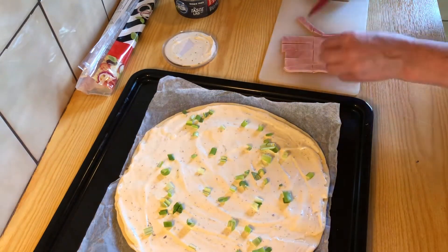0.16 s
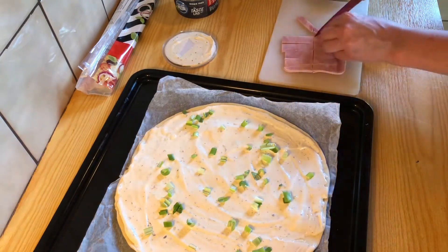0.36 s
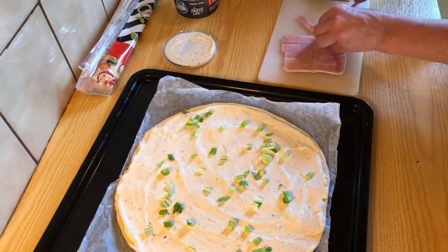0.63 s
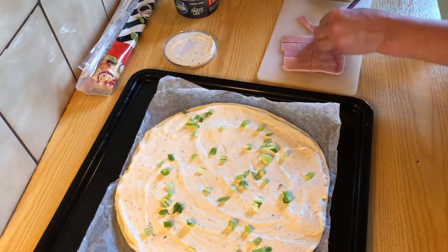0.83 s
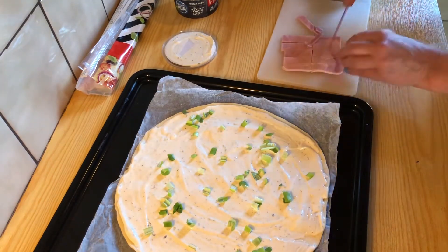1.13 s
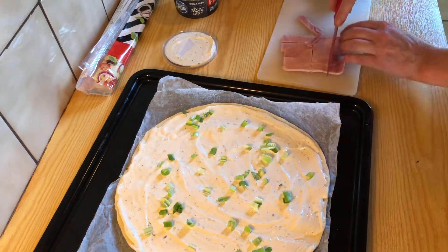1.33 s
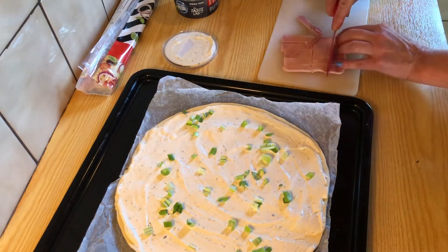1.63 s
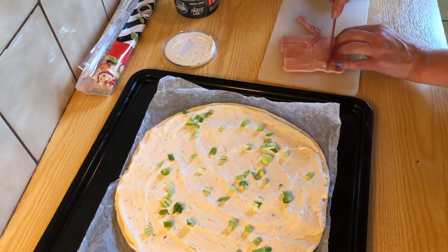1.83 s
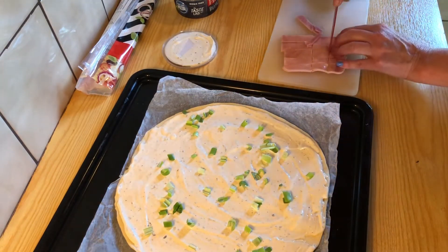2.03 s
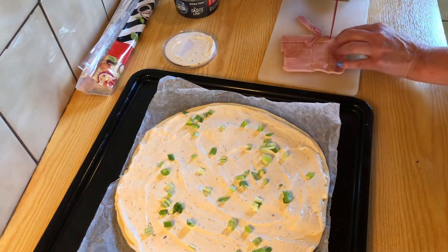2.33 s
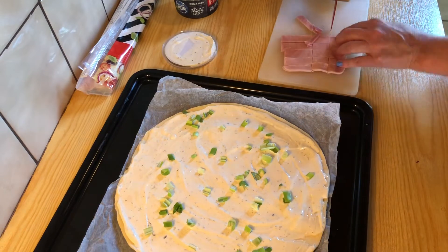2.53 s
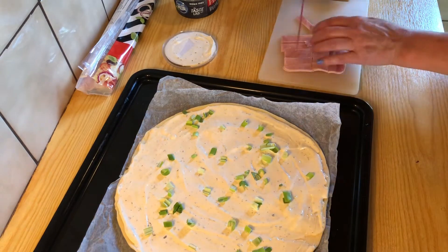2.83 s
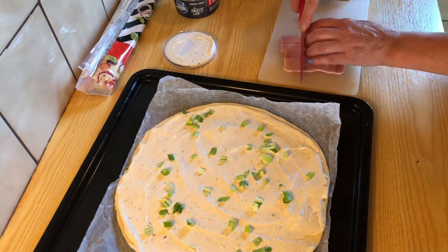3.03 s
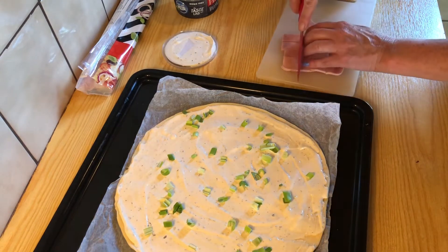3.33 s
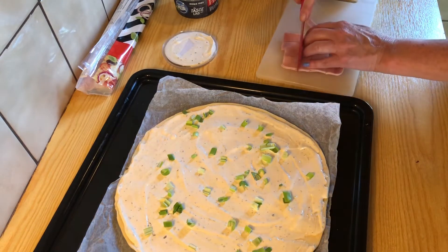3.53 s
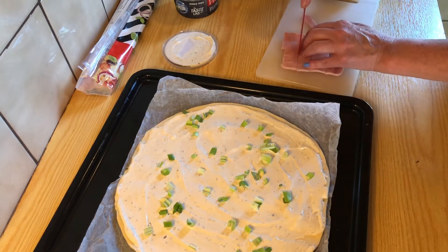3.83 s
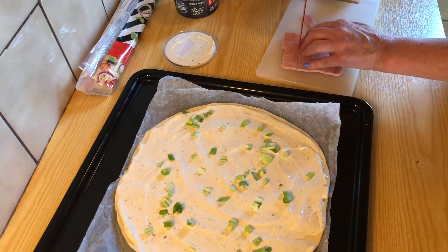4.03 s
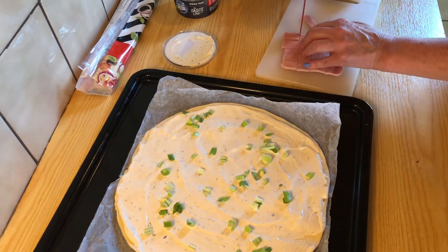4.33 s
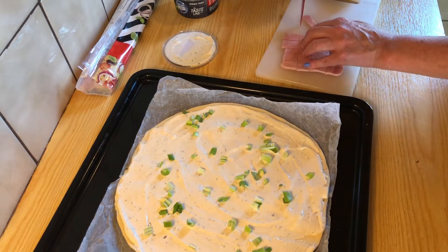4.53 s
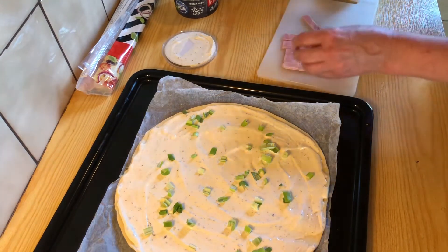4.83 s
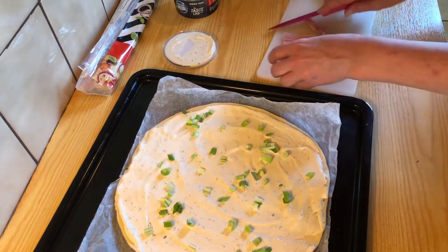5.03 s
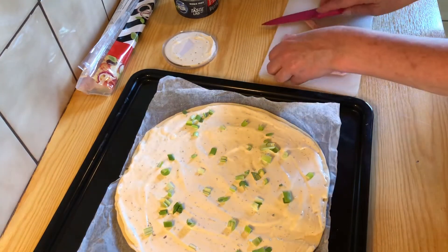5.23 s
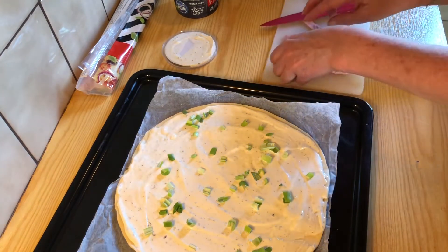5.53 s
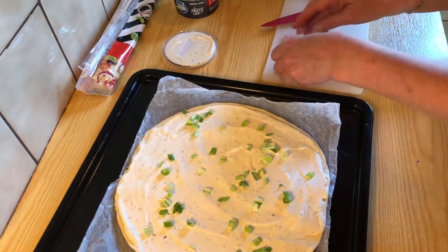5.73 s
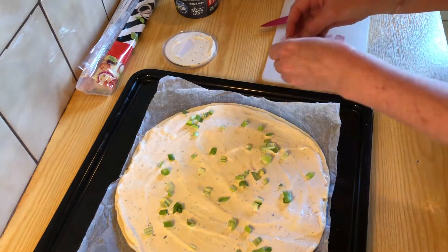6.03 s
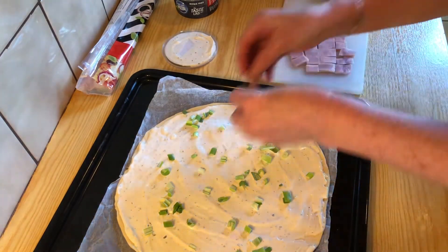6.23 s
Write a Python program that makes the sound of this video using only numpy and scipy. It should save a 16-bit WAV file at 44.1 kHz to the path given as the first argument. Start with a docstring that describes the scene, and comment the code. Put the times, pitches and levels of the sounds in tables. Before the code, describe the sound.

In a quiet small kitchen, an appliance hums steadily under faint room hiss. Close by, a knife scrapes across a plastic cutting board in short, uneven strokes, making small wet sounds as it slices ham. Light taps lead to a sharp knock, and a heavier stroke makes the board shudder. The knife is then laid down with two loud clacks, followed by fading rubs and squelches.

```python
"""A kitchen knife slices ham on a plastic board on a wooden table, over motor hum and room air.
From the start the edge rasps over the board by stick and slip, and the wet slices squelch as they part.
The edge knocks on the board now and then, hard at 3 s; at 4.5 s a firm stroke makes the board judder.
Near 5 s the knife is put down: board, blade and handle clatter. A few fading rubs and squelches follow."""
import sys
import numpy as np
from scipy import signal
from scipy.fft import rfft, irfft
from scipy.io import wavfile

SR = 44100
rng = np.random.default_rng(int(sys.argv[2]) if len(sys.argv) > 2 else 0)


def unload_audio(sound):
    """Save the sound as a 16-bit wav file, at the path given as the first command line argument."""
    columns = np.transpose(np.atleast_2d(sound))
    # keep every value between -1 and 1, then stretch to whole-number steps
    steps = np.round(np.clip(columns, -1, 1) * 32767)
    wavfile.write(sys.argv[1], SR, steps.astype(np.int16))


N = 281358
TIME_S = np.arange(N) / SR

# spectra of a moist snap, bright part and hollow part: f/Hz, relative density/dB
FIZZ_SPECTRUM = [(1500, -67.5), (3500, 3), (5500, 5), (8000, -1), (11000, -5), (15500, -9.5)]
SMACK_SPECTRUM = [(500, -42.5), (1100, 11.5), (1500, 10.5), (2200, 9), (3200, 9), (4200, -10.5),
                  (6000, -25), (12000, -42)]


def gain_of(db):
    """Decibels to amplitude."""
    return 10 ** (np.asarray(db) / 20)


def unit_rms(x):
    """Scales to rms 1."""
    return x / np.sqrt(np.mean(x ** 2) + 1e-20)


def lookup(points, hz):
    """Interpolates a table over log frequency."""
    f, value = np.transpose(points)
    return np.interp(np.log(hz + 1), np.log(f + 1), value)


def add(mix, start_s, sound):
    """Mixes a sound in, in place."""
    part = mix[max(round(start_s * SR), 0):][:len(sound)]
    part += sound[:len(part)]


def colour(x, spectrum, peaks=(), size=4096):
    """Minimum-phase filter: broad spectrum plus resonance peaks."""
    hz = abs(np.fft.fftfreq(size, 1 / SR))
    peaks_db = sum(lift / (1 + (2 * (hz - f) / width) ** 2) for f, width, lift in peaks)
    log_gain = np.log(gain_of(lookup(spectrum, hz) + peaks_db))
    response = np.exp(np.conj(signal.hilbert(log_gain)))
    return signal.oaconvolve(x, np.fft.ifft(response).real[:size // 2])[:len(x)]


def drift(rate_hz):
    """Slow random wander, rms 1."""
    hz = np.fft.rfftfreq(N, 1 / SR)
    return unit_rms(irfft(rfft(rng.standard_normal(N)) * np.exp(-(hz / rate_hz) ** 2), N))


def grains(per_s, spread_db):
    """Random impulses of uneven size, rms 1."""
    size = gain_of(spread_db * np.minimum(rng.exponential(1, N), 4))
    return unit_rms(size * rng.choice([-1, 1], N) * (rng.random(N) < per_s / SR))


def air():
    """Room hiss and slowly sinking rumble."""
    # f/Hz, relative density/dB
    hiss_spectrum = [(180, -43), (300, -14), (378, -3), (398, -4), (477, -2.5), (554, -8.5), (602, -3),
                     (784, -3.5), (896, -2.5), (1270, -9.5), (1710, -16.5), (6330, -24), (15800, -31)]
    rumble_spectrum = [(20, -29), (36, -40), (48, -2), (65, 7.5), (80, 1), (100, 10), (125, -2),
                       (170, -4.5), (250, -8), (400, -14), (900, -66.5)]
    hiss = unit_rms(colour(rng.standard_normal(N), hiss_spectrum))
    rumble = unit_rms(colour(rng.standard_normal(N), rumble_spectrum, size=16384))
    sink_db_per_s = 0.52
    return gain_of(-65) * hiss + gain_of(-61.5 - sink_db_per_s * TIME_S) * rumble


def motor():
    """Appliance hum, strongest at three times the shaft rate, with a faint whine."""
    # multiple of the shaft rate, level/dB, unsteadiness 0-1
    harmonics = [(1, -70.5, 1), (2, -71, 0.6), (3, -55.5, 0.16), (4, -78, 0.2), (5, -78.5, 0), (11, -80, 0),
                 (12, -76, 0.09), (15, -79.5, 0), (25, -86, 1)]
    # f/Hz, level/dB
    whine_tones = [(4662, -89), (4910, -90), (6137, -88), (6675, -99), (8129, -90)]
    shaft_hz, sink_db_per_s = 49.09, 0.14
    out = np.zeros(N)
    for multiple, db, unsteady in harmonics:
        phasor = np.exp(2j * np.pi * (multiple * shaft_hz * TIME_S + rng.random()))
        wobble = 1 + unsteady * (drift(rate_hz=0.9) + 1j * drift(rate_hz=2.6))
        out += gain_of(db) * (phasor * wobble).real
    for hz, db in whine_tones:
        gain = gain_of(db + 0.7 * drift(rate_hz=0.94))
        out += gain * np.sin(2 * np.pi * hz * TIME_S + 0.6 * drift(rate_hz=6))
    return np.sqrt(2) * out * gain_of(-sink_db_per_s * (TIME_S - TIME_S.mean()))


def kitchen(x, early_db, tail_db, early_s):
    """Adds quick scatter from table and tray, then the tail of a small tiled room."""
    # f/Hz, t60/s
    reverb_times = [(100, 0.2), (300, 0.31), (1000, 0.25), (2200, 0.22), (5000, 0.22), (12000, 0.17)]
    t = np.arange(SR // 2) / SR
    early, late = rng.choice([-1., 1.], (2, len(t))) * (rng.random((2, len(t))) < 4000 / SR)
    early *= np.exp(-t / early_s) * (t > 0.0015)
    # small things on the table reflect little bass
    early = signal.sosfilt(signal.butter(2, 402, "highpass", fs=SR, output="sos"), early)
    hz, frame_s, bands = signal.stft(late * (t > 0.009), SR, nperseg=256)
    decay = gain_of(-60 * frame_s / lookup(reverb_times, hz)[:, None])
    tail = signal.istft(bands * decay, SR, nperseg=256)[1][:len(t)]
    echoes = gain_of(early_db) * early / np.linalg.norm(early)
    echoes += gain_of(tail_db) * tail / np.linalg.norm(tail)
    return x + signal.oaconvolve(x, echoes)[:N]


def stroke_gains():
    """Gains of rasp, judder and crackle; pressure builds and eases once per stroke."""
    # edge or meat over the board: start/s, hardest/s, end/s, rasp/dB, judder/dB, crackle/dB
    strokes = [ (0.0, 0.22, 0.41, -66, -71.5, -78), (0.412, 0.474, 0.52, -75, -61.5, -97),
               (0.588, 0.69, 0.92, -62.5, -74, -71.5), (0.684, 0.824, 0.9, -64.5, -53.5, -95),
               (1.022, 1.077, 1.324, -57, -63, -66), (1.305, 1.52, 1.8, -62, -68.5, -79),
               (1.738, 1.992, 2.19, -58, -69.5, -69), (2.146, 2.218, 2.45, -59.5, -65, -72.5),
               (2.29, 2.48, 2.7, -63, -58.5, -73.5), (2.803, 2.99, 3.13, -68, -69, -69),
               (3.366, 3.90, 4.2, -67.5, -68, -73), (4.08, 4.234, 4.41, -62.5, -61.5, -82),
               (4.35, 4.46, 4.74, -59, -52.5, -76.5), (4.506, 4.553, 4.595, -46, -44, -91),
               (5.012, 5.14, 5.46, -59, -55, -69), (5.638, 5.7, 5.87, -65, -60, -92),
               (6.043, 6.277, 6.6, -86, -73, -77), ]
    swells_db = (8.5, 12, 10.5)  # lightest touch to full pressure
    touch_s = 0.044
    powers = np.zeros((3, N))
    for start_s, hardest_s, end_s, *levels_db in strokes:
        t = np.arange(start_s, end_s, 1 / SR)
        pressure = np.interp(t, [start_s, hardest_s, end_s], [0, 1, 0])
        contact = np.clip(np.minimum(t - start_s, end_s - t) / touch_s, 0, 1)
        for power, db, swell_db in zip(powers, levels_db, swells_db):
            add(power, start_s, (contact * gain_of(db + swell_db * (pressure - 1))) ** 2)
    return np.sqrt(powers)


def moist_crackle(gain):
    """Patches of tiny wet snaps as the edge works through the meat."""
    tilt_db_per_oct, smack_db = 2, -5
    snaps = grains(per_s=700, spread_db=1.5) * gain_of(2.1 * drift(rate_hz=32))
    tilted = [(hz, db + tilt_db_per_oct * np.log2(hz / 8000)) for hz, db in FIZZ_SPECTRUM]
    fizz = unit_rms(colour(snaps, tilted))
    smack = unit_rms(colour(snaps, SMACK_SPECTRUM))
    return gain * (fizz + gain_of(smack_db) * smack)


def squelches():
    """Ham parts: moisture films snap in clumps, each ringing in its own pockets between the slices."""
    # t/s, length/s, fizz/dB, smack/dB, fizz tilt/(dB/octave)
    clumps = [ (0.047, 0.027, -72.5, -70, 4), (0.148, 0.01, -67, -66, -2), (0.181, 0.03, -63.5, -63, 10),
              (0.2345, 0.003, -66, -59, 1), (0.252, 0.057, -67.5, -67, 2), (0.323, 0.02, -58.5, -62.5, 2),
              (1.058, 0.022, -52.5, -57.5, 2.5), (1.099, 0.13, -66.5, -66, 5),
              (1.209, 0.014, -62.5, -59.5, -2), (1.586, 0.037, -60, -57, 3),
              (1.616, 0.011, -54, -51.5, 3.5), (1.831, 0.013, -63.5, -61, 6), (1.903, 0.034, -54.5, -55, 6),
              (1.968, 0.064, -55.5, -57.5, 0.5), (2.041, 0.0042, -48.5, -48, -1),
              (2.401, 0.012, -61.5, -71, -2), (2.437, 0.066, -64.5, -63.5, 12),
              (2.577, 0.0052, -64.5, -76, 4), (2.829, 0.008, -57.5, -63, 2.5), (2.844, 0.021, -67, -66, -1),
              (2.925, 0.081, -71, -81, 16), (3.436, 0.052, -79, -69, 1), (3.615, 0.029, -74, -75, 9),
              (4.041, 0.041, -70, -66.5, 4), (4.512, 0.062, -65.5, -60.5, 0), (4.69, 0.039, -66.5, -72, 6),
              (4.766, 0.0075, -64.5, -69.5, 8), (5.45, 0.028, -64.5, -68.5, 2),
              (6.045, 0.038, -71.5, -68.5, 6), ]
    out = np.zeros(N)
    snaps = grains(per_s=3000, spread_db=1.0)
    for start_s, length_s, fizz_db, smack_db, tilt in clumps:
        window = signal.windows.tukey(int((length_s + 0.004) * SR), 0.6)
        clump = unit_rms(snaps[int(start_s * SR):][:len(window)])
        burst = np.pad(clump * window, (0, 512))
        pockets_hz = 1300 * 1.59 ** (np.arange(6) + rng.random(6))
        peaks = [(hz, 0.22 * hz, 5.5) for hz in pockets_hz]
        tilted = [(hz, db + tilt * np.clip(np.log2(hz / 8000), -1, 0.6)) for hz, db in FIZZ_SPECTRUM]
        fizz = gain_of(fizz_db) * unit_rms(colour(burst, tilted, peaks, size=1024))
        smack = gain_of(smack_db) * unit_rms(colour(burst, SMACK_SPECTRUM, peaks, size=1024))
        add(out, start_s - 0.0015, np.std(burst) * (fizz + smack))
    return out


def scrapes():
    """Friction feeds one resonance of blade or board, which glides as the contact moves."""
    # start/s, loudest/s, end/s, first f/Hz, last f/Hz, width/Hz, level/dB
    glides = [ (0.046, 0.052, 0.105, 2860, 2950, 250, -69), (0.23, 0.233, 0.275, 1270, 1280, 121, -54.5),
              (0.332, 0.336, 0.355, 1355, 1340, 121, -53.5), (0.64, 0.772, 0.86, 1547, 850, 650, -58.5),
              (1.413, 1.61, 1.645, 1298, 1580, 380, -61), (2.375, 2.395, 2.52, 1150, 1140, 170, -56),
              (4.382, 4.563, 4.58, 3100, 2774, 1100, -64), (4.41, 4.452, 4.58, 1155, 1146, 200, -55.5),
              (4.529, 4.56, 4.582, 271.6, 296, 93.5, -41.5), (5.141, 5.155, 5.162, 2120, 2350, 350, -49.5),
              ]
    out = np.zeros(N)
    for start_s, loudest_s, end_s, first_hz, last_hz, width_hz, db in glides:
        t = np.arange(start_s, end_s, 1 / SR)
        pole = np.exp(-np.pi * width_hz / SR)
        friction = rng.standard_normal(SR) + 1j * rng.standard_normal(SR)
        flutter = signal.lfilter([1], np.poly([pole, pole]), friction)[-len(t):]
        phasor = np.exp(2j * np.pi * np.cumsum(np.geomspace(first_hz, last_hz, len(t))) / SR)
        envelope = np.interp(t, [start_s, loudest_s, end_s], [0, 1, 0])
        add(out, start_s, gain_of(db) * envelope * unit_rms((flutter * phasor).real))
    return out


def slicing(rasp_gain, judder_gain):
    """The edge sticks and slips on the plastic; under pressure the whole board judders."""
    # f/Hz, relative density/dB
    rasp_spectrum = [(240, -24), (400, -10.5), (558, -5.5), (734, -5.5), (841, -8.5), (1160, -8.5),
                     (1250, -7.5), (1740, -10.5), (2220, -14), (2510, -17), (3010, -19.5), (15000, -44.5)]
    judder_spectrum = [(90, -22), (160, 1.5), (235, 6.5), (300, 1.5), (365, 0), (450, -12.5), (700, -30.5),
                       (1500, -81)]
    # f/Hz, width/Hz, lift/dB
    rub_resonances = [(372, 41, 3.5), (733, 13, 1), (920, 11, 9), (1095, 80, 7.5), (1386, 110, 6.5),
                      (1520, 170, -3.5), (2330, 270, 1.5)]
    slips = grains(per_s=1500, spread_db=0.5) * gain_of(2.9 * drift(rate_hz=51))
    rasp = unit_rms(colour(slips, rasp_spectrum, rub_resonances))
    judder = unit_rms(colour(slips, judder_spectrum, rub_resonances))
    return rasp_gain * rasp + judder_gain * judder


def ring(modes, rise_s):
    """Free ringing of a struck object; neighbouring modes alternate in sign."""
    t = np.arange(SR // 2) / SR
    swing = sum((-1) ** k * gain_of(db - 60 * t / t60_s) * np.sin(2 * np.pi * hz * t)
                for k, (hz, db, t60_s) in enumerate(modes))
    return swing * (1 - np.exp(-t / rise_s))


def crack(spectrum, decay_s):
    """Short noise burst, as from many well damped modes."""
    t = np.arange(SR // 2) / SR
    return colour(rng.standard_normal(len(t)) * np.exp(-t / decay_s), spectrum)


def knocks():
    """The edge clicks and rings; the knife's weight lands, rings board and handle, and bounces twice."""
    # t/s, landing lag/s, first flight/s, board/dB, blade/dB, handle/dB, click/dB, cushioning/s
    blows = [ (0.357, 0.0011, 0.011, -41, -73, -81, -70, 0.0021),
             (0.841, 0.0011, 0.009, -46, -72, -74, -76, 0.0012),
             (2.398, 0.00059, 0.0068, -45.5, -50, -53, -54, 0.00062),
             (2.497, 0.001, 0.0069, -49, -41, -60, -55, 0.00044),
             (2.553, 0.0013, 0.021, -43, -61, -65, -78, 0.00062),
             (2.9932, 0.004, 0.00476, -27, -30, -44, -46.5, 0.0005),
             (3.1093, 0.00031, 0.021, -52, -51, -58, -66, 0.0005),
             (3.6092, 0.00028, 0.006, -63, -54, -58, -68, 0.0004),
             (4.555, 0.001, 0.0073, -46, -59, -46, -71, 0.00062),
             (4.9513, 0.0035, 0.0042, -21.5, -25, -31, -35.5, 0.00028),
             (5.1575, 0.0017, 0.0072, -26, -25.5, -26, -56, 0.00077),
             (5.3273, 0.0015, 0.004, -52, -41, -61, -37.5, 0.00043), ]
    # f/Hz, relative level/dB, t60/s
    board_modes = [(75, -18, 0.23), (120, -15.5, 0.19), (183.6, -4.5, 0.061), (234, 1.5, 0.045),
                   (255.6, -9, 0.074), (282, -19, 0.027), (367.6, -5.5, 0.1), (401, -15, 0.17),
                   (454, -8.5, 0.056), (730, -4, 0.026), (954, -2, 0.047)]
    blade_modes = [(994, -17, 0.12), (1174, -7.5, 0.025), (1385, 4, 0.0092), (1573, -6.5, 0.03),
                   (1767, -12, 0.025), (1940, -19, 0.037), (2475, -10, 0.015), (2960, -17, 0.0089),
                   (3200, -14, 0.015)]
    handle_modes = [(424, -18.5, 0.29), (581, -11, 0.11), (737, -1.5, 0.05), (797, -9.5, 0.074),
                    (920, -9.5, 0.15), (1106, -4, 0.044), (1572, 0.5, 0.045), (1640, -6, 0.028),
                    (1744, -6.5, .05), (2030, -7, 0.056), (2257, -2, 0.045), (2370, -19, 0.05),
                    (2340, -13, 0.018), (3000, -23, 0.032), (3780, -14, 0.018)]
    # contact click and dull plastic clack: f/Hz, relative density/dB
    click_spectrum = [(300, -53), (900, -24), (1350, -7), (2300, 8), (3800, 3.5), (5000, 0), (7500, 1.5),
                      (10000, -1.5), (11500, -12), (16000, -16)]
    clack_spectrum = [(100, -16), (250, -1.5), (700, 0.5), (1500, 3), (2300, -1), (3300, -10.5),
                      (5000, -19.5), (12000, -38.5)]
    clack_db, edge_again_db = 3, -5
    bounce_loss_db, flight_ratio = 9.5, 0.57
    board = ring(board_modes, rise_s=0.00057)
    blade = ring(blade_modes, rise_s=0.00046)
    handle = ring(handle_modes, rise_s=0.00089)
    out = np.zeros(N)
    for start_s, lag_s, flight_s, board_db, blade_db, handle_db, click_db, cushion_s in blows:
        pole = np.exp(-1 / (SR * cushion_s))
        thud = signal.lfilter([1 - pole], [1, -pole], board)  # ham under the edge dulls the blow
        clicks = [crack(click_spectrum, decay_s=0.0023) for _ in range(4)]
        edges = [gain_of(blade_db) * blade + gain_of(click_db) * click for click in clicks]
        add(out, start_s, edges[0])
        landing_s = start_s + lag_s
        for bounce, edge in enumerate(edges[1:]):
            clack = gain_of(clack_db) * crack(clack_spectrum, decay_s=0.0071)
            weight = gain_of(board_db) * thud + gain_of(handle_db) * (handle + clack)
            impact = weight + gain_of(edge_again_db) * edge
            add(out, landing_s, gain_of(-bounce_loss_db * bounce) * impact)
            landing_s += flight_s * flight_ratio ** bounce
    return out


def scene():
    """Cutting and clatter with room echoes, over hum and air; mono."""
    rasp_gain, judder_gain, crackle_gain = stroke_gains()
    cutting = slicing(rasp_gain, judder_gain) + scrapes() + squelches() + moist_crackle(crackle_gain)
    cutting = kitchen(cutting, early_db=-6, tail_db=-9, early_s=0.012)
    clatter = kitchen(knocks(), early_db=-11, tail_db=-8.5, early_s=0.017)
    return (cutting + clatter + motor() + air())[None]


def record(dry):
    """Steep bass cut and band limit."""
    low_hz, high_hz = 42, 15780
    highpass = signal.butter(6, low_hz, "highpass", fs=SR, output="sos")
    lowpass = signal.firwin(511, high_hz, window=("kaiser", 9), fs=SR)
    return signal.oaconvolve(signal.sosfilt(highpass, dry), lowpass[None], "same")


dry = scene()
out = record(dry)
unload_audio(out)
```